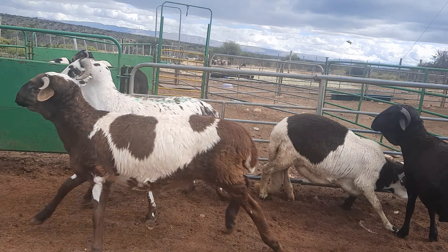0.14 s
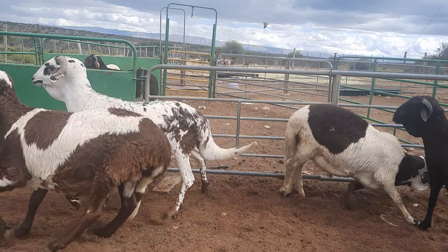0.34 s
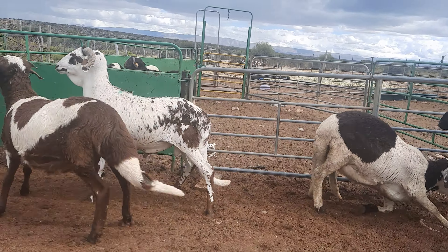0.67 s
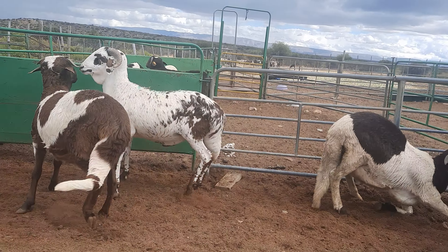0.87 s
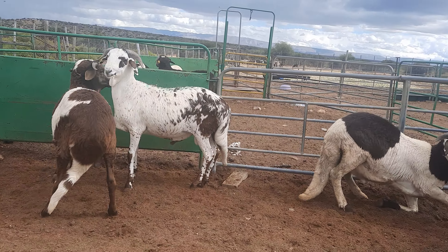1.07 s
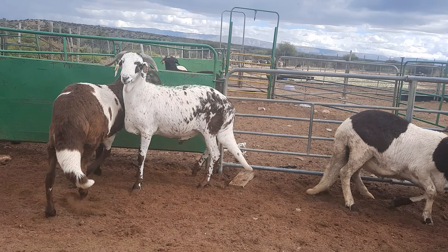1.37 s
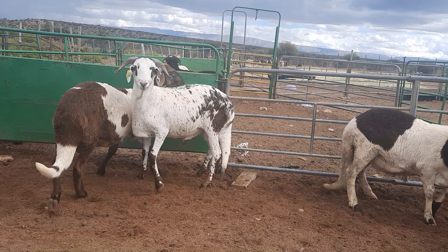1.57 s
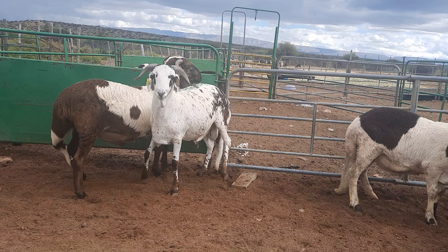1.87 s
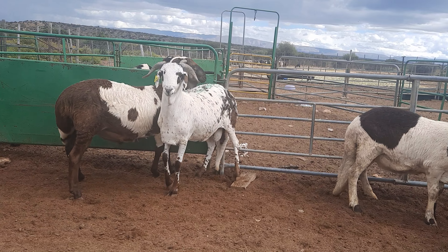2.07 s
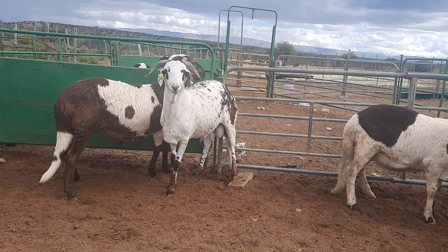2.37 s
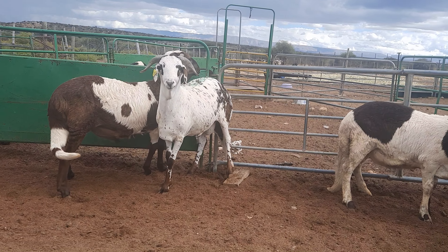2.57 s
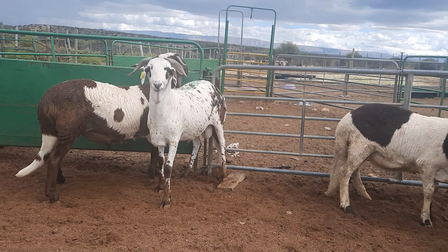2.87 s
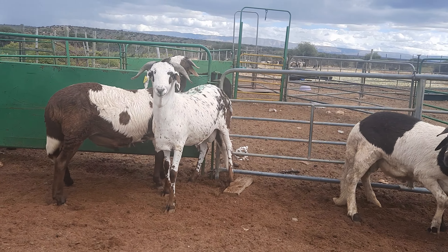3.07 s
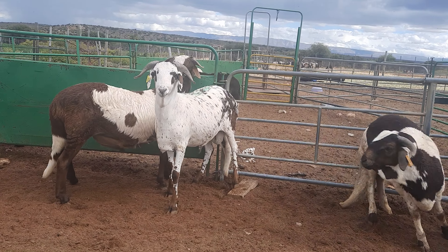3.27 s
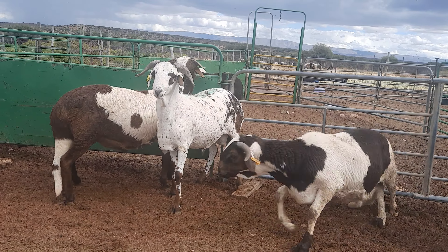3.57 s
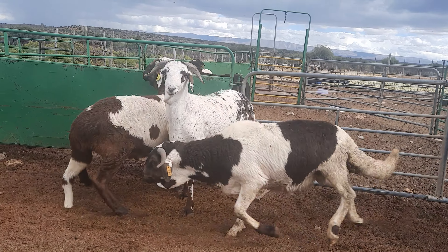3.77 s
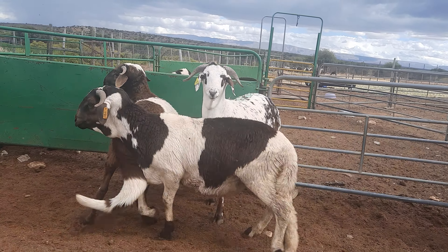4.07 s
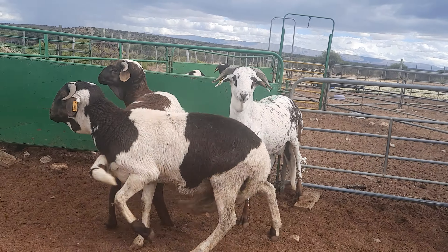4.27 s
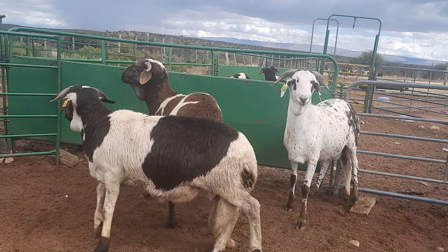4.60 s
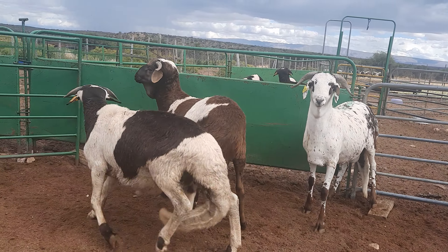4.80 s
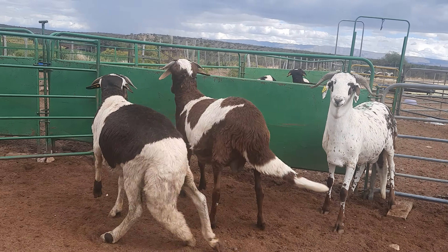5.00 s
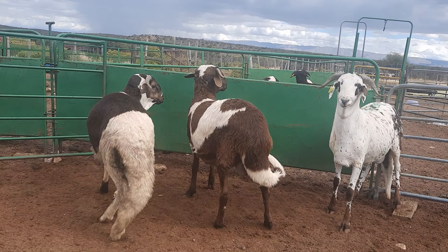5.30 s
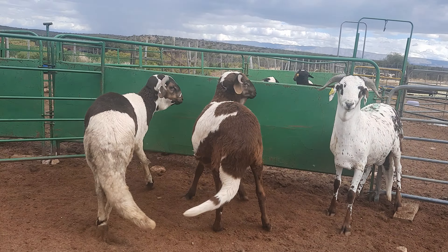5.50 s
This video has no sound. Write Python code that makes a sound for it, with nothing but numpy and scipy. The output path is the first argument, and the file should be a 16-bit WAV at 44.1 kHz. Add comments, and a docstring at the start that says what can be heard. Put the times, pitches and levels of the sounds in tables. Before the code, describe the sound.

Outdoors in a dirt pen, sheep shuffle heavily at first with low thuds, gritty scuffs and a sharp pebble click, then ease off. A stronger burst of wind bumps, hoof knocks and trampling comes mid-way, more scuffing follows, then calm. Small birds chirp throughout, near and far. A handheld stereo microphone catches wind rumble.

```python
"""Wind buffets two microphone ports while sheep trample a dirt pen with steel rails.
Filtered noise makes the wind, rumbling ground, gritty scuffs and brushing fleece; gliding sines make
small birds, a few near and many far. Hooves knock in dull cycles, pebbles snap and ring, a loose rail
rattles as a tapped resonance, and later a soft hiss climbs in pitch. Open-country hush lies under all."""
import sys
import numpy as np
from scipy import signal
from scipy.io import wavfile
from scipy.ndimage import uniform_filter1d

SR = 44100
rng = np.random.default_rng(int(sys.argv[2]) if len(sys.argv) > 2 else 0)


def persist_wave(psi):
    """Save psi, clipped to +-1, as 16-bit WAV."""
    counts = np.round(np.clip(psi, -1, 1) * 32767).astype(np.int16)
    wavfile.write(sys.argv[1], SR, np.atleast_2d(counts).T)


N = 249165


def amp(db):
    """Gain of a level in dB."""
    return 10 ** (np.asarray(db) / 20)


def evened(x):
    """Scales to rms 1."""
    return x / np.sqrt(np.mean(x ** 2) + 1e-20)


def read(points, hz):
    """Interpolates a spectrum table on a log-frequency axis."""
    point_hz, value = np.transpose(points)
    return np.interp(np.log(hz + 1), np.log(point_hz + 1), value)


def curves(rows):
    """Interpolates the columns of a time table, sample by sample."""
    time_s, *columns = np.transpose(rows)
    return [np.interp(np.arange(N) / SR, time_s, column) for column in columns]


def add(mix, start_s, sound, pan_db):
    """Places a sound in the stereo mix; pan_db is left minus right."""
    part = mix[:, round(start_s * SR):][:, :sound.shape[-1]]
    part += sound[..., :part.shape[1]] * amp([[pan_db / 2], [-pan_db / 2]])


# left-right likeness of noise: freq_hz, likeness (0-1)
PORT_LIKENESS = [(130, 1), (400, 0.66), (1400, 0.013)]


def noise(colour, patchy_db, flicker_db, alike=1, size=512):
    """Stereo noise of rms 1 with drifting patches and a flicker shared by all pitches."""
    hop = size // 4
    frames, hz = N // hop + 5, np.fft.rfftfreq(size, 1 / SR)
    a, b, c, d, patches = rng.standard_normal((frames, len(hz), 5)).T
    patches = uniform_filter1d(patches, size=6, axis=0)  # across pitch
    patches = evened(uniform_filter1d(patches, size=14, axis=1))  # across time
    flicker = evened(uniform_filter1d(rng.standard_normal(frames), size=4))
    same = np.clip(alike * read(PORT_LIKENESS, hz), -1, 1)[:, None]
    left, other = a + 1j * b, c + 1j * d
    right = same * left + np.sqrt(1 - same ** 2) * other
    level_db = read(colour, hz)[:, None] + patchy_db * patches + flicker_db * flicker
    spectra = np.array([left, right]) * amp(level_db)
    return evened(signal.istft(spectra, nperseg=size, noverlap=size - hop)[1][:, :N])


def yard(x, t60_s, wet_db):
    """Fence panels scatter sparse echoes back, differently to each port."""
    t = np.arange(SR // 2) / SR
    taps = rng.standard_normal((2, len(t))) * (rng.random((2, len(t))) < .05)
    taps *= amp(-60 * t / t60_s) * (t > .003)
    echoes = signal.fftconvolve(x, taps / np.linalg.norm(taps[0]), axes=1)[:, :N]
    return x + amp(wet_db) * echoes


def flutter(depth_db=3.5):
    """Random quick wavering of a sound's level, as a gain."""
    return amp(depth_db * evened(uniform_filter1d(rng.standard_normal(N), size=400)))


# gusts on the ports: full_s, held_s, level_db, left_minus_right_db
GUSTS = [(0, 0.27, -46.5, 1), (.7, 0.85, -65, -5), (1.4, 0.44, -51.5, 10), (1.98, 0.33, -58.5, 6),
         (2.33, 0.29, -41.5, 9), (2.8, 0.39, -50.5, -1), (3.55, 0.3, -54, -2)]
# sudden buffets: start_s, envelope_peak_db
BUFFETS = [(1.496, -39), (1.724, -36.5), (2.318, -36.5), (2.515, -33.5), (2.577, -32), (4.237, -48.5)]
# turbulence colour: freq_hz, level_db
GUST_COLOUR = [(25, -35), (50, 27.5), (75, 22), (120, 7.5), (260, -70)]
CALM_DB, GUST_RISE_DB_PER_S, GUST_FALL_DB_PER_S = -70, 229, 88
BUFFET_HZ, BUFFET_SWELL_S, BUFFET_OVERTONE_DB = 71, .015, -9


def wind():
    """Lumpy low turbulence, little related at the two ports; buffets favour the left port."""
    t, power = np.arange(N) / SR, amp(CALM_DB) ** 2
    for full_s, held_s, level_db, pan_db in GUSTS:
        rise_db = GUST_RISE_DB_PER_S * np.maximum(full_s - t, 0)
        fall_db = GUST_FALL_DB_PER_S * np.maximum(t - full_s - held_s, 0)
        gust_db = level_db - rise_db - fall_db
        power = power + amp([gust_db + pan_db / 2, gust_db - pan_db / 2]) ** 2
    out = noise(GUST_COLOUR, 2, 3, alike=-.1, size=1024) * np.sqrt(power)
    t = np.arange(0, .09, 1 / SR)
    u = t / BUFFET_SWELL_S
    envelope = (u * np.exp(1 - u)) ** 2
    pitches_hz = BUFFET_HZ * rng.uniform(.88, 1.15, len(BUFFETS))
    for (start_s, peak_db), hz in zip(BUFFETS, pitches_hz):
        overtone = amp(BUFFET_OVERTONE_DB) * np.cos(4 * np.pi * hz * t)
        flap = np.sin(2 * np.pi * hz * t) + overtone
        add(out, start_s, amp(peak_db) * flap * envelope, 14.)
    return out


GRIT_PER_S, GRIT_DB, GRIT_SPREAD_DB = 500, -5, 3.5


def crackle():
    """Dirt grains as a gain: dense, overlapping bursts of a few milliseconds, a few of them large."""
    size = amp(GRIT_SPREAD_DB * np.minimum(rng.exponential(1, N), 5))
    size *= rng.random(N) < GRIT_PER_S / SR
    return evened(signal.lfilter([1], [1, -np.exp(-1 / (.003 * SR))], size))


# flock moving: time_s, trample_db, scuff_db, thump_db
HERD = [(0, -53.5, -52.5, -53.5), (.25, -53.5, -58, -50.5), (.72, -53, -68.5, -60.5),
        (1.15, -62, -76.5, -68), (1.9, -75, -79, -80), (2.28, -68, -83, -74), (2.45, -50.5, -57, -50.5),
        (2.68, -54, -52.5, -50), (2.87, -55, -66, -64), (3.3, -56.5, -64.5, -59.5),
        (3.55, -51.5, -59.5, -50.5), (3.85, -55, -69.5, -51), (4.3, -67, -68.5, -64),
        (4.45, -75.5, -70, -74.5), (5.65, -79.5, -77, -80.5)]
# hooves dragged through grit: start_s, level_db, t60_s, bright_share (0-1)
DRAGS = [(0.597, -47, 0.29, 0), (1.249, -50, 0.24, 0), (1.968, -61, 0.11, 0.29),
         (3.3367, -50.5, 0.45, 0.98), (3.525, -46, 0.4, 0.8), (3.873, -52, 0.15, 0.1),
         (4.182, -49, 0.34, 0)]
# fleece brushing on fleece: peak_s, length_s, peak_db
BRUSHES = [(0.438, 0.37, -68.5), (1.064, 0.22, -73.5), (2.437, 0.14, -66.5), (2.893, 0.14, -64.5),
           (3.66, 0.046, -67), (4.226, 1, -72), (5.107, 0.13, -68)]
# ground and fleece colours: freq_hz, level_db
THUMP_COLOUR = [(70, -5), (130, 10), (180, 11), (260, -47)]
RUMBLE_COLOUR = [(170, -15), (280, 2), (420, -13), (600, -13.5), (900, -50.5)]
SCUFF_COLOUR = [(400, -9), (800, -1), (1500, -6.5), (3000, -10.5), (7000, -22.5), (9500, -33.5)]
FLEECE_COLOUR = [(4000, 2.5), (7500, 4.5), (9500, -1), (12000, 3.5), (15500, -6.5)]
GRIT_COLOUR = [(300, -5), (900, -8), (2300, -2), (4000, -12.5), (7000, -20.5), (10000, -29)]
RUSTLE_DB, RUSTLE_DB_PER_TRAMPLE_DB = -81.5, .76  # fleece level while trampling is at -62 dB
SLOW_RISE_S = .025  # extra swell of the dullest drags


def herd():
    """Trampled ground thumps and rumbles, loose dirt hisses in grains, fleece brushes on fleece."""
    rumble_db, scuff_db, thump_db = curves(HERD)
    thump = noise(THUMP_COLOUR, 2.2, 2.5, alike=.7, size=1024)
    rumble = noise(RUMBLE_COLOUR, 2, 1.5, size=1024)
    scuff, fleece = noise(SCUFF_COLOUR, 2, 2.5), noise(FLEECE_COLOUR, 1, 1.2)
    grit, dull = noise(GRIT_COLOUR, 1.8, 1.5), noise(SCUFF_COLOUR, 1.8, 1.5)
    grains = 1 + amp(GRIT_DB) * crackle()
    scuff, grit, dull = evened(scuff * grains), evened(grit * grains), evened(dull * grains)

    out = amp(thump_db) * thump + amp(rumble_db) * rumble
    out += amp(scuff_db + np.array([[-1.5], [1.5]])) * scuff  # right is louder
    out += fleece * amp(RUSTLE_DB + RUSTLE_DB_PER_TRAMPLE_DB * (rumble_db + 62.))
    t = np.arange(N) / SR
    for peak_s, length_s, peak_db in BRUSHES:
        out += fleece * amp(peak_db) * np.exp(-(2 * (t - peak_s) / length_s) ** 2)
    for start_s, level_db, t60_s, bright in DRAGS:
        share = np.clip(bright, 0, 1)
        drag = np.sqrt(share) * grit + np.sqrt(1 - share) * dull
        decay = amp(level_db - 60 * np.maximum(t - start_s, 0) / t60_s)
        rise_s = .004 + SLOW_RISE_S * (1 - share) ** 4
        out += drag * decay * np.clip((t - start_s) / rise_s, 0, 1)
    return out


def whistle(hz, level_db, fade=.6):
    """A sine along a pitch curve, softly started and stopped."""
    tone = np.sin(2 * np.pi * np.cumsum(hz) / SR)
    return np.sqrt(2) * amp(level_db) * tone * signal.windows.tukey(len(hz), fade)


SPILL_S = .003  # fades extend this far beyond a note's ends


def sing(mix, start_s, points, level_db):
    """One unbroken whistle along a rounded pitch line."""
    time_s, pitch_hz = np.transpose(points)
    t = np.arange(time_s[0] - SPILL_S, time_s[-1] + SPILL_S, 1 / SR)
    hz = uniform_filter1d(np.interp(t, time_s, pitch_hz), size=280, mode="nearest")
    add(mix, start_s + t[0], whistle(hz, level_db, fade=.3), -6.)


# far flock: time_s, level_db
FLOCK = [(0, -59.5), (.55, -71), (1.0, -65.5), (1.65, -75), (2.1, -64), (2.6, -88), (3.2, -67), (3.7, -81),
         (4.4, -69.5), (5.0, -81.5), (5.4, -64.5), (5.65, -71.5)]
# nearest bird's falling note with a ledge, then an arch; each a list of: offset_s, pitch_hz
SONG = [
    [(0, 5500), (.019, 5000), (.031, 4400), (.046, 4150), (.064, 4500), (.08, 3900), (.102, 2570)],
    [(.111, 2590), (.122, 3830), (.132, 4350), (.143, 3930), (.157, 3250)],
]
# its songs: start_s, level_db
SONGS = [(0.099, -57), (2.31, -53.5)]
# joined phrases, an arch into a slow rise: level_db, list of (time_s, pitch_hz)
PHRASES = [(-70.5, [(1.016, 3240), (1.027, 4450), (1.043, 3340), (1.087, 3800)]), (-63.5, [(5.285, 3190),
           (5.297, 4200), (5.314, 4650), (5.331, 3750), (5.363, 3940)]), (-60.5, [(5.416, 3460),
           (5.425, 4800), (5.443, 2900), (5.468, 3700), (5.497, 3730)])]
# single strokes: start_s, length_s, from_hz, to_hz, arch_above_glide_hz, level_db
STROKES = [ (.35, .043, 3800, 2600, -100, -65), (.359, .038, 5950, 3900, 0, -64.5),
           (0.782, 0.017, 4900, 3570, -3, -66), (.84, 0.046, 5050, 3150, 152, -69.5),
           (.892, 0.018, 3100, 2740, 1000, -63.5), (.922, .012, 3200, 4230, 0, -66),
           (0.963, 0.0294, 4600, 3780, -300, -63.5), (1.107, 0.015, 4600, 3480, 0, -70),
           (1.193, .015, 3840, 3470, 0, -70), (1.235, 0.043, 2950, 3230, 713, -65),
           (1.308, .026, 5600, 5700, 400, -75), (1.915, 0.0086, 2750, 3520, 3, -69),
           (1.933, 0.014, 3920, 3760, -1050, -63.5), (2.041, .014, 4600, 3740, 4, -67),
           (2.132, 0.03, 4000, 3030, 60, -66), (2.203, .008, 5630, 5560, -2, -68.5),
           (2.597, 0.025, 4500, 3570, -52, -60), (3.113, 0.029, 3800, 2690, -2, -72),
           (3.225, .022, 2900, 3000, 1100, -65), (3.251, .01, 2900, 4100, 0, -62),
           (3.272, .024, 3400, 4400, 650, -68), (3.297, .034, 3940, 3900, -50, -67),
           (4.327, 0.041, 3670, 2640, -2, -72), (4.365, 0.017, 3240, 3000, 948, -67),
           (4.392, 0.0062, 3400, 4170, 0, -65), (4.288, 0.11, 2454, 2150, 121, -76),
           (4.432, 0.049, 4210, 4100, -150, -68.5), (4.48, 0.073, 2455, 2990, 187, -73.5),
           (4.557, 0.03, 4400, 5400, 98, -66), (4.568, 0.079, 2900, 1990, -85, -77.5),
           (4.583, 0.035, 5350, 4340, -200, -67), (4.753, 0.034, 3480, 2930, 907, -69),
           (4.79, 0.041, 3300, 3300, 405, -65), (4.788, 0.09, 2550, 2615, 195, -70),
           (5.256, 0.022, 2800, 2670, 1197, -60), (5.234, 0.025, 4670, 4770, -600, -70),
           (5.378, 0.033, 2790, 3000, 930, -63.5), (5.617, 0.02, 3350, 2730, 0, -71.5)]
# thin high pips of one small bird: start_s, length_s, level_db
PIPS = [(1.263, 0.029, -77), (3.966, 0.042, -59.5), (4.65, 0.022, -74.5), (5.335, 0.023, -77.5)]
PIP_HZ, PIP_RISE_HZ_PER_S = 7270, 12600


def birds():
    """Near birds whistle songs, phrases and strokes; many quick far swoops blur together."""
    near, far = np.zeros((2, 2, N))
    for start_s, level_db in SONGS:
        for points in SONG:
            sing(near, start_s, points, level_db)
    for level_db, points in PHRASES:
        sing(near, 0, points, level_db)

    strokes = list(STROKES)
    for start_s, length_s, level_db in PIPS:
        to_hz = PIP_HZ + PIP_RISE_HZ_PER_S * length_s
        strokes.append((start_s, length_s, PIP_HZ, to_hz, 0, level_db))
    chances = rng.standard_normal(len(strokes))
    for (start_s, length_s, from_hz, to_hz, arch_hz, level_db), chance in zip(strokes, chances):
        u = np.arange(-SPILL_S, length_s + SPILL_S, 1 / SR) / length_s
        hz = from_hz + (to_hz - from_hz) * u + arch_hz * (1 - (2 * u - 1) ** 2)
        add(near, start_s - SPILL_S, whistle(hz, level_db), -6. + 5 * chance)

    for when, a, b, c, d, e in rng.random((1300, 6)):
        u = np.linspace(-1, 1, round((.01 + .03 * a) * SR))
        centre_hz = 2900 + 1000 * (b + e) + 1600 * d ** 6
        hz = centre_hz - 1700 * (c - .25) * u - 600 * d * u ** 2
        add(far, when * N / SR, whistle(hz, 0), -7. + 12. * (a - .5))
    far = amp(curves(FLOCK)[0]) * evened(yard(far, t60_s=.11, wet_db=30.))
    return yard(near * flutter(depth_db=2.3), t60_s=.13, wet_db=-5.) + far


# hoof knocks: start_s, envelope_peak_db
KNOCKS = [(0.2205, -37), (2.582, -37.5), (2.739, -27), (2.753, -32.5), (2.766, -38), (3.959, -39),
          (5.08, -53.5)]
# pebble clicks: start_s, snap_peak_db, snap_centre_hz, snap_length_ms, ring_hz, ring_re_snap_db, swell_ms
CLICKS = [(.2819, -24, 5500, 1.6, 3100, 0, .45), (1.071, -56, 7000, 1.5, 3400, -25, .5),
          (2.583, -41, 1800, 3, 2500, -6, .6), (2.681, -45, 1500, 3, 1500, -6, .8),
          (3.0695, -37, 10000, 8, 3400, -30, .5), (3.091, -28, 12000, 1.5, 1900, -16, 1.6),
          (4.142, -35, 5500, 1.6, 2500, -1, .5), (4.871, -45, 17000, 1.5, 3400, -25, .5)]
# pebble ring modes: multiple_of_ring_hz, level_db
PEBBLE_MODES = [(.23, -14.5), (.55, -12), (1, -4.5), (1.94, -14)]
KNOCK_HZ = 400


def hits():
    """Knocks are a few dull cycles; clicks are a noise snap, other at each port, and a short ring."""
    out, t = np.zeros((2, N)), np.arange(0, .03, 1 / SR)
    u = t * KNOCK_HZ / .41  # envelope peaks after 0.41 cycle
    knock = np.sin(2 * np.pi * KNOCK_HZ * t) * u * np.exp(1 - u)
    for start_s, peak_db in KNOCKS:
        add(out, start_s, amp(peak_db) * knock, -1.5)

    hisses = rng.standard_normal((len(CLICKS), 2, len(t)))
    for (start_s, peak_db, centre_hz, length_ms, ring_hz, ring_db, swell_ms), hiss in zip(CLICKS, hisses):
        u = t * 2000 / length_ms  # envelope peaks at half the length
        # 0.5 to 1.5 times the centre, as fractions of Nyquist
        band = signal.butter(1, [centre_hz / SR, min(3 * centre_hz / SR, .9)], "bandpass")
        snap = signal.lfilter(*band, hiss) * (u * np.exp(-u)) ** 4
        snap /= abs(snap).max(axis=1, keepdims=True)
        ring = 0
        for multiple, mode_db in PEBBLE_MODES:
            v = t * 1000 * np.sqrt(multiple) / swell_ms  # low modes swell more slowly
            mode = np.sin(2 * np.pi * multiple * ring_hz * t)
            ring = ring + amp(ring_db + mode_db) * v * np.exp(1 - v) * mode
        add(out, start_s, amp(peak_db) * (snap + ring), -2.5)
    return out


# loose rail rattling: start_s, length_s, pitch_hz, starting_level_db
RATTLES = [(.222, 0.4, 1820, -60), (0.6, 0.6, 1844, -60.5), (2.188, 0.79, 1900, -69)]
TAPS_PER_S, RAIL_T60_S, RATTLE_FALL_DB = 80, .081, 27.


def rail():
    """Quick uneven taps keep one ring of the steel tube going and die away."""
    out, t = np.zeros((2, N)), np.arange(0, .1, 1 / SR)
    for start_s, length_s, pitch_hz, level_db in RATTLES:
        n = round(length_s * SR)
        wander = uniform_filter1d(rng.standard_normal(n), size=400) * 20  # about rms 1
        turns = np.cumsum(TAPS_PER_S * (1 + .5 * wander)) / SR
        taps = np.diff(np.floor(turns), prepend=0) * rng.uniform(.6, 1, n)
        tube = amp(-60 * t / RAIL_T60_S) * np.sin(2 * np.pi * pitch_hz * t)
        ring = evened(signal.fftconvolve(taps, tube)[:n])
        fall = amp(level_db - RATTLE_FALL_DB * np.arange(n) / n)
        add(out, start_s, ring * fall * signal.windows.tukey(n, .1), -3.)
    return out


# climbing soft hiss: time_s, centre_hz, level_db
SWISH = [(2.6, 5700, -80), (2.8, 6160, -67), (3.15, 7500, -70.5), (3.35, 7670, -70)]


def swish(width_hz=1200):
    """Narrow noise carried along a rising pitch."""
    hz, level_db = curves(SWISH)
    slow = signal.lfilter(*signal.butter(2, width_hz / SR), rng.standard_normal((2, 2, N)))
    carrier, t = np.exp(2j * np.pi * np.cumsum(hz) / SR), np.arange(N) / SR
    hiss = evened(((slow[0] + 1j * slow[1]) * carrier).real)
    sounding = (t > SWISH[0][0]) & (t < SWISH[-1][0])
    return amp(level_db) * sounding * flutter() * hiss


# hush colour: freq_hz, level_db
AIR_COLOUR = [(40, 1), (120, -36), (300, 2), (900, -19.5), (1150, -7.5), (1500, -23), (5500, -10),
              (9500, -19), (15500, -18.5)]
HUSH_DB = -71.5


def scene():
    """Everything in the pen over the hush of open country."""
    hush = amp(HUSH_DB) * noise(AIR_COLOUR, 1.5, .8, size=1024)
    clatter = yard(hits(), t60_s=.045, wet_db=-16.5)
    return wind() + herd() + birds() + clatter + rail() + swish() + hush


LOW_CUT_HZ, EDGE_HZ = 40, 15800


def record(dry):
    """The microphone drops the deepest bass; the recorder's band limit removes the top."""
    thinned = signal.lfilter(*signal.butter(3, 2 * LOW_CUT_HZ / SR, "highpass"), dry)
    lowpass = signal.firwin(511, EDGE_HZ, window=("kaiser", 9), fs=SR)
    return signal.oaconvolve(thinned, lowpass[None], "same")


dry = scene()
out = record(dry)
persist_wave(out)
```